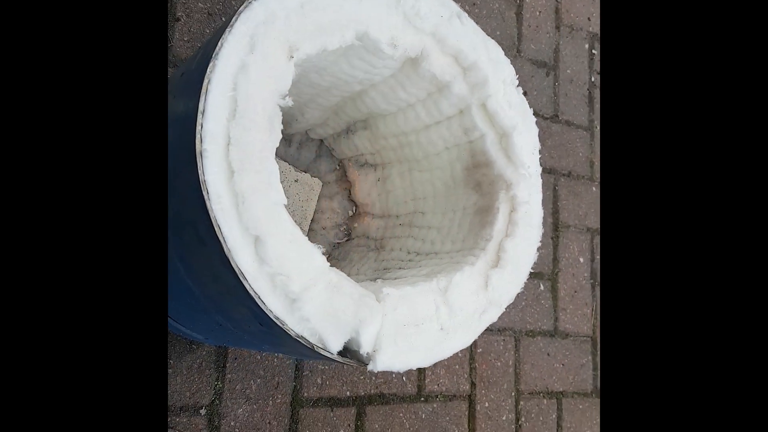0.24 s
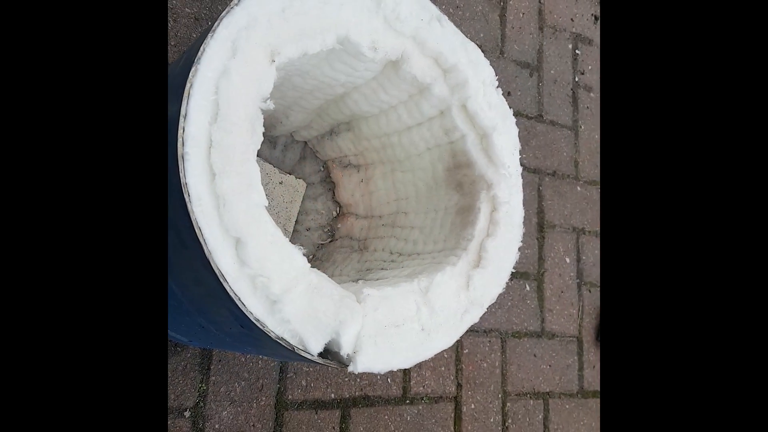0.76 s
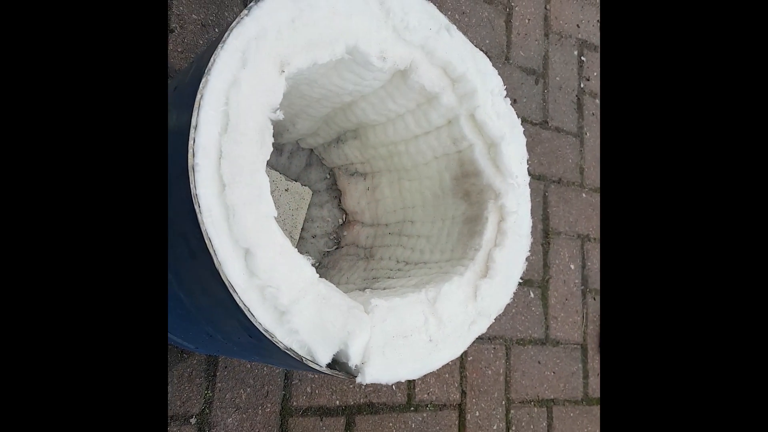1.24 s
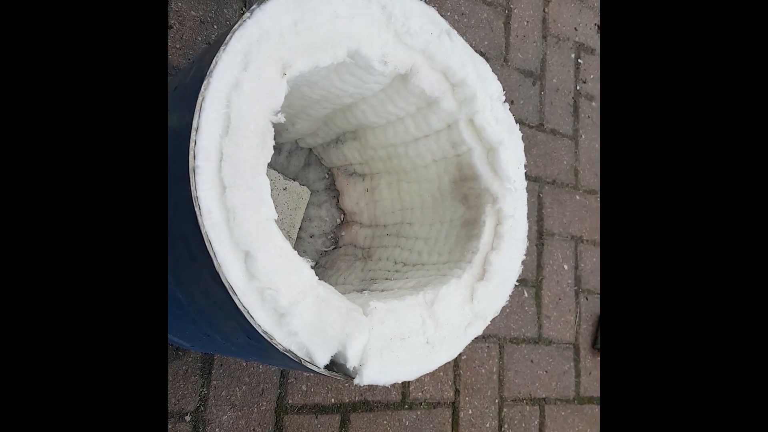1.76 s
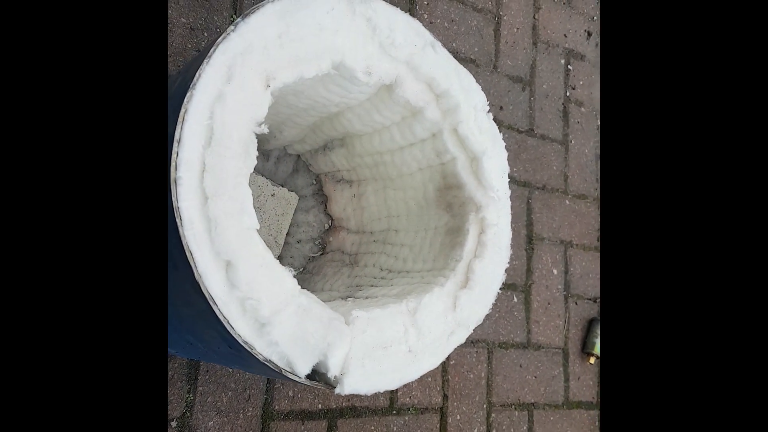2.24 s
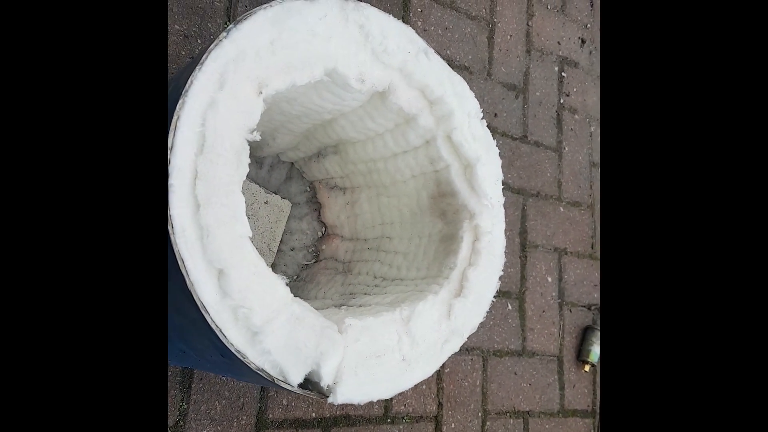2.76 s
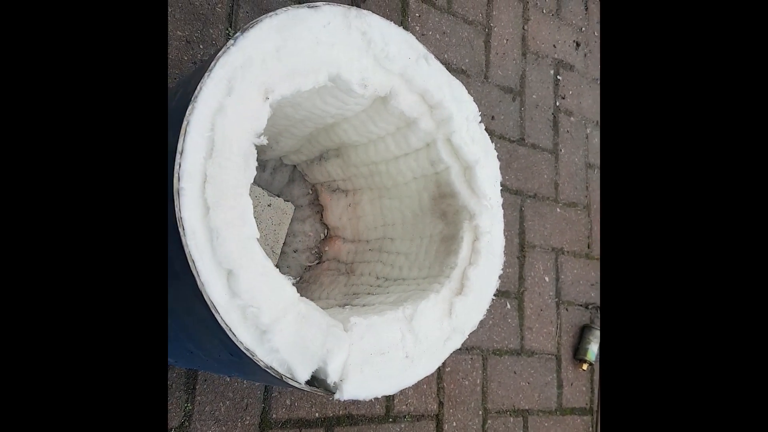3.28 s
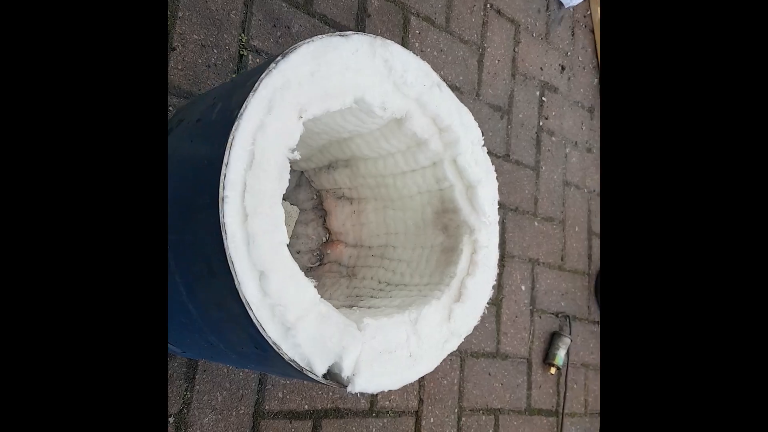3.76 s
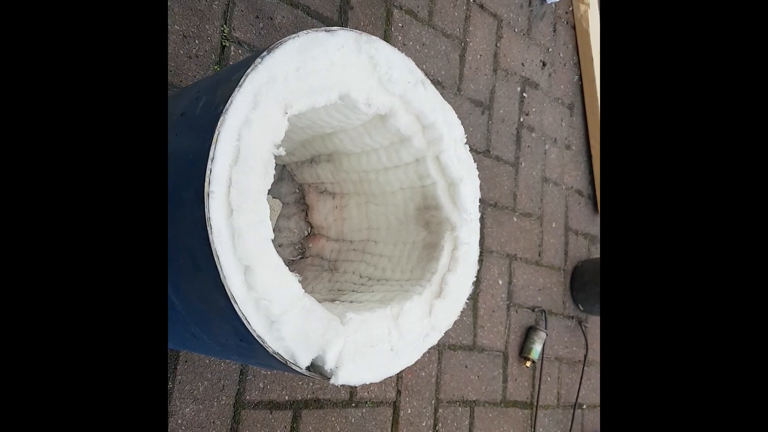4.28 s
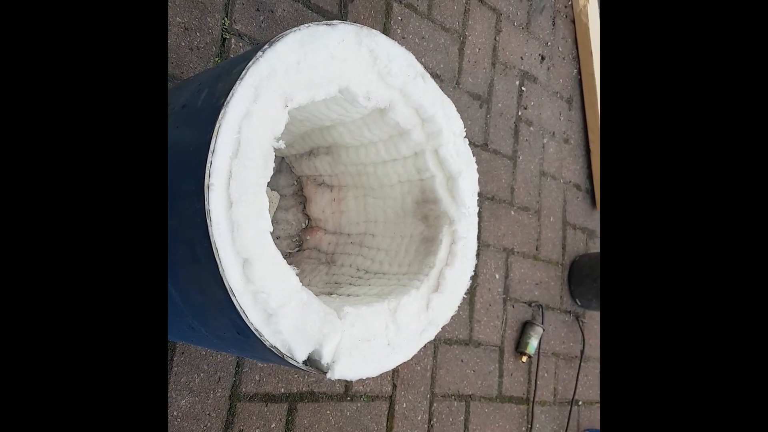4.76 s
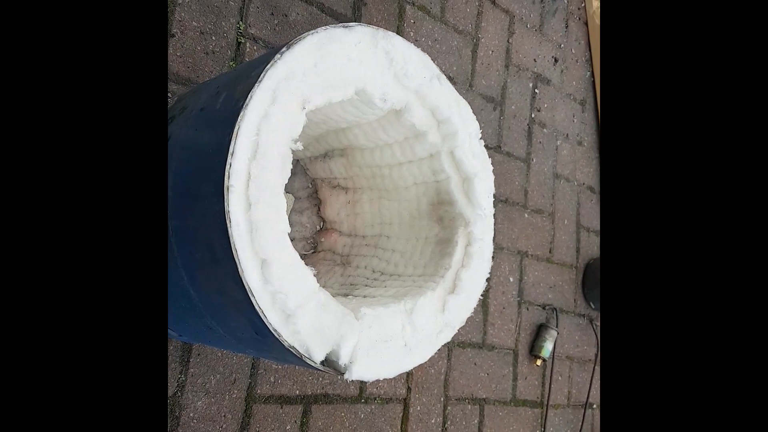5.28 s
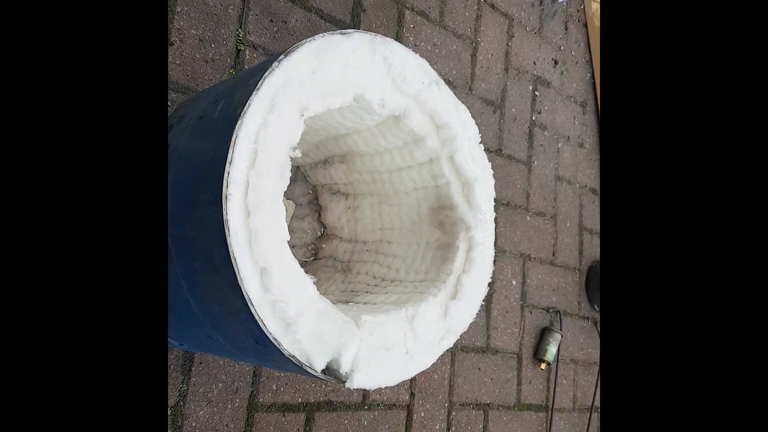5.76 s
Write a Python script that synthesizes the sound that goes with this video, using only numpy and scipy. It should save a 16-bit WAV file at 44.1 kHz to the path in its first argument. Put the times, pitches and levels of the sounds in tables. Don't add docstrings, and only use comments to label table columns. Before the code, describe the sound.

Close, loud rush of a gas flame in an open drum, low and hollow-ringing, with faint fluttering nozzle hiss, easing sharply at the close.

```python
import sys
import numpy as np
from scipy import signal
from scipy.fft import rfft, irfft, next_fast_len
from scipy.io import wavfile
from scipy.ndimage import uniform_filter1d, map_coordinates

SR = 44100
rng = np.random.default_rng(int(sys.argv[2]) if len(sys.argv) > 2 else 0)


def generate_wav(signal):
    frames = np.transpose(np.atleast_2d(signal))
    scaled = np.clip(frames, -1, 1) * 32767
    pcm = np.round(scaled).astype(np.int16)
    wavfile.write(sys.argv[1], SR, pcm)


def gain_from_db(level_db):
    decades = np.asarray(level_db, float) / 20
    return 10 ** decades


N = 265526

# t/s, burn/dB, fullness of the roar over the drum's ring/dB, tearing at the edge/dB,
# heat lifting the ring/0-1
BURN = [(0, -27, 0.5, 1, .5), (.33, -28, 2.5, 0.5, .6), (.5, -22.5, 0.5, 0.5, 0.4), (.8, -20.5, -1, 0, 0.9),
        (1.1, -21, -0.5, -0.5, 0.5), (1.5, -20.5, -0.5, -0.5, .8), (1.85, -20, -1, -2, .5),
        (2.2, -19.5, -2, -0.5, 0.7), (2.45, -23, 1.5, -0.5, .4), (2.75, -21, 1.5, 1.5, .4),
        (3.05, -22.5, 6, 1, .3), (3.3, -21, 1.5, 1, .4), (3.55, -19.5, -1, -0.5, 0.6), (3.8, -21, 2, 0, .7),
        (4.1, -21.5, 0, 0, 0.4), (4.35, -21.5, 2.5, -1, .5), (4.7, -20, 0.5, 1, 0.4),
        (5.0, -21.5, 1.5, 0, 0.3), (5.27, -20.5, 1, 2, .5), (5.45, -27.5, 1, 0.5, .5), (5.6, -28, 3, 0, .5),
        (6.02, -29, 2, -0.5, .6)]
# t/s, pressure/dB, keenness of the edge tone/dB, shaded port turned towards it/dB
NOZZLE = [(0, -69, 0, 1), (.33, -68, -0.5, -1.5), (.5, -63.5, 4, -5), (.62, -58, -4, -2.5),
          (.85, -55.5, -2.5, -1.5), (1.0, -57, 3.5, 0), (1.15, -57.5, 0, 0), (1.2, -64, 4, 6),
          (1.28, -58, -1, -2.5), (1.7, -57.5, 3, -5), (1.93, -58, 2.5, -2.5), (2.18, -60, -0.5, -1.5),
          (2.32, -63.5, -2, 2), (2.6, -61.5, 2.5, 1.5), (2.86, -61.5, -2.5, -1), (2.89, -56.5, -2, -2),
          (3.04, -57, 5, 2.5), (3.12, -62.5, -2, 2), (3.26, -61, 1, 5), (3.36, -57.5, -1, -3.5),
          (3.55, -57, 1, -0.5), (3.9, -58.5, 0.5, -2.5), (4.2, -58, 6, -0.5), (4.45, -58.5, 1.5, 3),
          (4.72, -55.5, 0, -1), (4.88, -60.5, 1.5, 6.5), (5.08, -56.5, 1, -1), (5.31, -54.5, 1, -6.5),
          (5.36, -63, -0.5, -5), (5.6, -67.5, 6.5, -4.5), (6.02, -70.5, -2.5, 0)]
# t/s, f/Hz
FLOOR_ECHO = [
    (0, 531.7),
    (2.5, 539),
    (4, 588),
    (5.3, 581),
    (6.02, 571),
]
FULL_JET_DB = -58


def unit(x):
    return x / np.sqrt(np.mean(x ** 2) + 1e-20)


def along(points, hz):
    f, v = np.transpose(points)
    return np.interp(np.log(hz + 1), np.log(f + 1), v)


def curves(rows):
    s, *cols = np.transpose(rows)
    return [np.interp(np.arange(N) / SR, s, c) for c in cols]


def wobble(rate):
    knots = rng.standard_normal(int(N * rate / SR) + 4)
    return map_coordinates(knots, [np.arange(N) * rate / SR])


def filtered(x, response):
    m = next_fast_len(N + 8192)
    return irfft(rfft(x, m) * response(np.fft.rfftfreq(m, 1 / SR)), m)[..., :N]


def colour(spectrum):
    below = [(spectrum[0][0] / 2, -120)]
    above = [(spectrum[-1][0] * 1.25, -120)]
    closed = below + list(spectrum) + above
    return lambda hz: gain_from_db(along(closed, hz))


def backing():
    hollow_hz, = curves(FLOOR_ECHO)
    return (hollow_hz - hollow_hz.min()) / np.ptp(hollow_hz)


def turbulence(patchy_db):
    z = signal.stft(rng.standard_normal((2, N)), nperseg=512)[2]

    def blur(bins, frames):
        across = uniform_filter1d(rng.standard_normal(z.shape[1:]), bins, axis=0)
        return unit(uniform_filter1d(across, frames, axis=1))

    field = blur(8, 5) + .5 * blur(4, 60)
    return signal.istft(z * gain_from_db(patchy_db * field), nperseg=512)[1][:, :N]


def ports(spectrum, patchy_db):
    # f/Hz, level/dB
    shade = [(35, -1.5), (100, 0), (400, -1.5), (600, -6), (1000, -7.5), (1300, -6), (1600, -3.5),
             (1800, -2.5), (2350, -1), (2600, -3), (3000, -7), (4400, -10.5), (5300, -9)]
    # f/Hz, likeness/0-1
    alike = [(30, .62), (70, .97), (300, .997), (470, .98), (600, .86), (700, .97), (1250, .985),
             (1600, .9), (1950, .45), (2300, .82), (2650, .6), (3000, .82), (3450, .35), (3800, .62)]
    # f/Hz, lag/rad
    lag = [(30, 0.16), (200, 0.36), (400, 0.86), (560, 1.05), (680, 1.01), (1400, 0.85), (1650, 1.6),
           (1900, 0.39), (2000, 2.2), (2300, 2), (2600, 4.9), (3000, 4.1), (4500, 4.7)]

    def share(hz):
        return np.clip(along(alike, hz), 0, 1)

    def late(hz):
        return gain_from_db(along(shade, hz)) * share(hz) * np.exp(-1j * along(lag, hz))

    def unlike(hz):
        return gain_from_db(along(shade, hz)) * np.sqrt(1 - share(hz) ** 2)

    direct, scattered = filtered(turbulence(patchy_db), colour(spectrum))
    shaded = filtered(direct, late) + filtered(scattered, unlike)
    pair = np.array([direct, shaded])
    return pair / np.std(pair.mean(0))


def flame(flutter):
    # f/Hz, level per Hz/dB
    roar_colour = [(60, -34), (95, -9.5), (130, -6.5), (175, 0.5), (230, -2), (300, -5), (400, -7),
                   (560, -18), (800, -21)]
    drum_colour = [(400, -21), (560, -15), (650, -14.5), (830, -16.5), (1000, -11.5), (1180, -5),
                   (1310, 1.5), (1440, -10), (1600, -20), (1800, -26), (2050, -39.5), (2400, -55.5)]
    edge_near = [(2400, -28.5), (2650, -6.5), (3000, 2), (3400, -14.5), (3700, -12), (4400, -14),
                 (5200, -19.5), (5700, -39)]
    edge_far = [(2300, -28), (2600, -10), (2850, 2.5), (3100, -1.5), (3350, -15.5), (3700, -10),
                (4400, -12.5), (5200, -18), (5700, -47)]
    lip_colour = [(1750, -32.5), (2050, -3), (2420, 4.5), (2650, -4.5), (2900, -18.5)]
    ring_lift = .05
    far = backing() ** 2
    drum_db, full_db, tear_db, heat = curves(BURN)
    heat = np.clip(heat, 0, 1)
    cool = [(hz * (1 - .5 * ring_lift), db) for hz, db in drum_colour]
    hot = [(hz * (1 + .5 * ring_lift), db) for hz, db in drum_colour]

    roar_db = drum_db + full_db - 0.35 * wobble(7.03)
    jet_db = curves(NOZZLE)[0] - FULL_JET_DB
    edge_db = drum_db - 33 + 0.39 * (jet_db - drum_db + drum_db.max())
    edge_db = edge_db + tear_db + 0.35 * wobble(4.0) + 0.7 * far
    lip_db = drum_db - 35.5 + 4 * far + 1.1 * wobble(5)

    flicker = wobble(35)
    roar = gain_from_db(roar_db + 0.19 * flicker) * ports(roar_colour, patchy_db=0.86)
    drum = np.sqrt(1 - heat) * ports(cool, patchy_db=0.56) + np.sqrt(heat) * ports(hot, patchy_db=0.9)
    drum = drum * gain_from_db(drum_db + .15 * flicker + 0.37 * wobble(8))
    edge = np.sqrt(1 - far) * ports(edge_near, patchy_db=1.55)
    edge = edge + np.sqrt(far) * ports(edge_far, patchy_db=2.0)
    edge = edge * gain_from_db(edge_db + 0.7 * flicker + 0.9 * flutter)
    lip = gain_from_db(lip_db + .5 * flicker) * ports(lip_colour, patchy_db=1.56)

    lean_db = .5 * wobble(3.26)
    heard = (roar + drum + edge + lip) * gain_from_db([lean_db, -lean_db])
    hz, t, z = signal.stft(heard, SR, nperseg=4096)
    off = (hz[:, None] - np.interp(t, *np.transpose(FLOOR_ECHO))) / 25
    hollowed = z * (1 - 0.72 / (1 + off ** 2))
    return signal.istft(hollowed, SR, nperseg=4096)[1][:, :N]


def edge_tone(pitch_hz, width_hz):
    a, b = filtered(rng.standard_normal((2, 2, N)), lambda hz: 1 / (1 + (hz / width_hz) ** 3))
    turn = 2 * np.pi * np.cumsum(pitch_hz) / SR
    facing, shaded = a * np.cos(turn) + b * np.sin(turn)
    return unit(np.array([facing, shaded + .3 * facing]))


def jet(flutter):
    # f/Hz, level per Hz/dB
    hiss_facing = [(4500, -37.5), (5400, -4), (6700, 0), (7400, 2.5), (7850, -8), (8100, -28),
                   (8450, -21.5), (8750, -13), (9300, -1.5), (10200, -10), (11500, -5), (12800, -2.5),
                   (14000, -9), (15700, -5)]
    hiss_shaded = [(4500, -25), (5300, -30), (5750, -20.5), (6400, -8), (6900, -29), (7500, -11),
                   (7900, -19.5), (8300, -32), (9200, -30), (10200, -28), (11500, -21), (14000, -29),
                   (15000, -23.5), (15700, -9)]
    hiss_shaded_far = [(4500, -18), (5300, -31), (5900, -15.5), (6400, -12), (6900, -28), (7500, -22.5),
                       (8300, -22), (9200, -23), (10200, -32), (11500, -28), (14000, -25), (15000, -18),
                       (15700, -16.5)]
    away = backing()
    far = away ** 2
    pressure_db, keen_db, turned_db = curves(NOZZLE)
    over_db = pressure_db - FULL_JET_DB
    hiss_db = pressure_db + 1.2 * flutter

    low_hz = np.maximum(6027 + 39.5 * over_db, 5660) + 30 * wobble(8.3)
    high_hz = 11300 + 69.5 * over_db + 409 * away + 60 * wobble(5.2)
    whistle_db = -57 + keen_db + over_db - 3 * away + 1.5 * wobble(17)
    shaded_db = 1.8 * wobble(6) - 0.33 * over_db + turned_db + 1.7

    facing, shaded = turbulence(patchy_db=3.0)
    facing = filtered(facing, colour(hiss_facing))
    shaded_close = filtered(shaded, colour(hiss_shaded))
    shaded_away = filtered(shaded, colour(hiss_shaded_far))
    shaded = (1 - far) * shaded_close + far * shaded_away
    hiss = np.array([facing, shaded * gain_from_db(shaded_db)]) / np.std(facing)
    spit_db = (0.24 * wobble(50) + 0.99 * wobble(90)) * np.array([[1], [.4]])
    hiss = hiss * gain_from_db(hiss_db + 7.5 + spit_db)

    low = edge_tone(low_hz + 70 * wobble(60), width_hz=190)
    low = low * gain_from_db(whistle_db + 6 + 0.54 * flutter + 2.2 * wobble(35))
    low = low * gain_from_db([0 * shaded_db, shaded_db - 18.5])
    unsteady_hz = 40.5 + 30 * np.clip(over_db + 8, 0, 9)
    high = edge_tone(high_hz + unsteady_hz * wobble(70), width_hz=320)
    high = high * gain_from_db(hiss_db - 0.15 * over_db - 4 + 5.2 * wobble(40)) * gain_from_db([[0], [-36]])
    return hiss + low + high


def draught():
    # f/Hz, level per Hz/dB
    rumble = [(15, -24), (30, -17.5), (50, -6), (80, -1), (105, 2.5), (140, -8.5), (200, -33)]
    burn_db = curves(BURN)[0]
    level_db = -34 + 0.17 * (burn_db - burn_db.mean()) - 0.5 * wobble(3.47)
    return gain_from_db(level_db) * ports(rumble, patchy_db=-1.0)


def floor():
    # f/Hz, level per Hz/dB
    noise_colour = [(3000, 2), (8000, -8), (12000, -8), (15700, 1.5)]
    return gain_from_db(-77.5) * unit(filtered(turbulence(patchy_db=0.0), colour(noise_colour)))


def scene():
    flutter = wobble(24)
    return flame(flutter) + draught() + jet(flutter) + floor()


def thinned(x):
    # f/Hz, level/dB
    faint = [(1400, 12), (2000, 8), (2400, 6), (3000, 7), (3400, 3.5), (4600, 1), (6000, 3), (7400, 1),
             (8300, -5), (9200, -1), (10200, -2), (11500, -1), (14500, -3)]
    faint_shaded = [(1400, 24), (2400, 19), (3000, 21), (3400, 15), (4600, 11), (5300, 7), (6000, 11),
                    (7400, 7), (8300, 0), (10200, -2), (11500, 0), (14500, 2), (15500, 6)]
    rise = np.cumsum(np.kaiser(1025, 4 * np.pi))
    rise = np.sqrt(rise[:-1] / rise[-1])
    window = np.r_[rise, rise[::-1]]
    phase = np.outer(np.arange(2048) + 512.5, np.arange(1024) + .5)
    basis = np.cos(np.pi / 1024 * phase) * window[:, None]
    halves = np.pad(x, ((0, 0), (1824, 3072 - (N + 1824) % 1024))).reshape(2, -1, 1024)
    lines = np.concatenate([halves[:, :-1], halves[:, 1:]], axis=2) @ basis
    hz = (np.arange(1024) + .5) * SR / 2048

    power = np.mean(lines[..., 186:720] ** 2, axis=2, keepdims=True)
    treble = np.sqrt(np.abs(uniform_filter1d(power, 3, axis=1))) + 1e-9
    whim_db = rng.standard_normal((2, lines.shape[1], 64)).repeat(16, axis=2) * [[[1.2]], [[3]]]
    step_db = np.array([along(faint, hz), along(faint_shaded, hz)])[:, None]
    step = treble * gain_from_db(whim_db + step_db)
    count = np.floor(np.abs(lines / step) ** .75 + .4054)
    kept = np.sign(lines) * step * count ** (4 / 3) * (hz < 15730)
    early, late = np.split(kept @ basis.T / 512, 2, axis=2)
    return (early[:, 1:] + late[:, :-1]).reshape(2, -1)[:, 800:N + 800]


def low_pass(x):
    return signal.sosfilt(signal.butter(12, 15730, fs=SR, output="sos"), x)


def record(dry):
    power = np.mean(dry ** 2, axis=0)

    def smooth(seconds):
        width = int(seconds * SR)
        return np.abs(uniform_filter1d(uniform_filter1d(power, width), width)) + 1e-9

    eased = dry * (smooth(.008) / smooth(.2)) ** -.1
    return low_pass(thinned(eased))


dry = scene()
out = record(dry)
generate_wav(out)
```